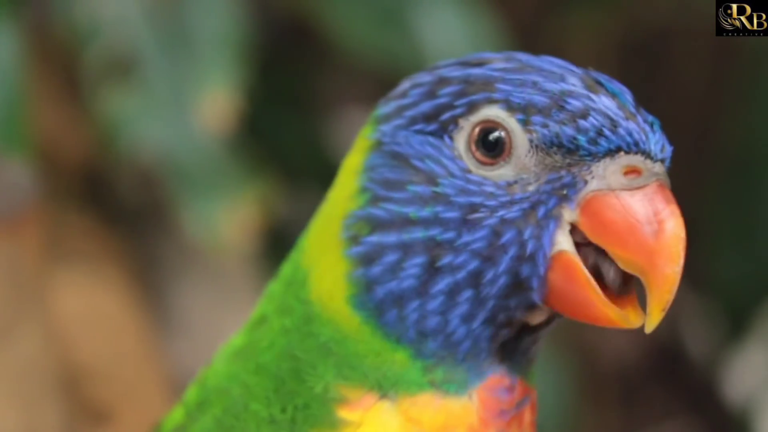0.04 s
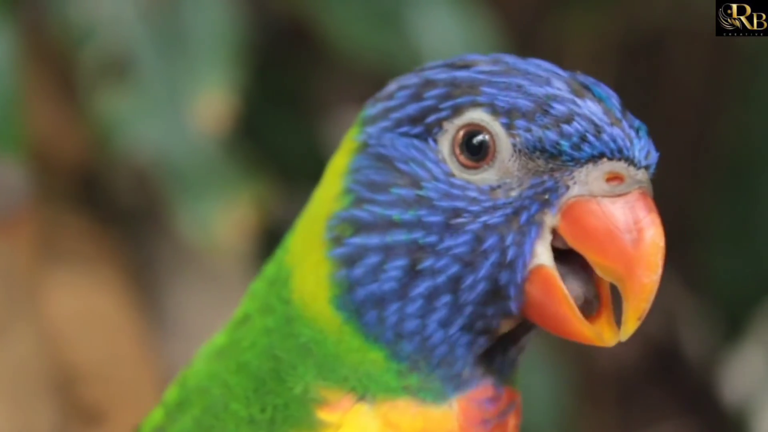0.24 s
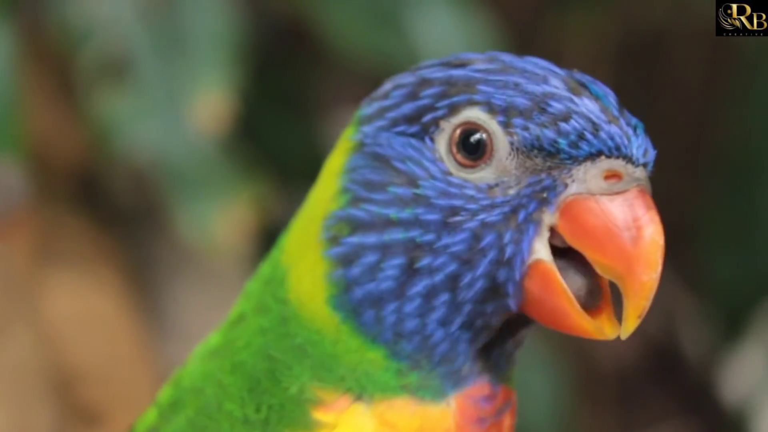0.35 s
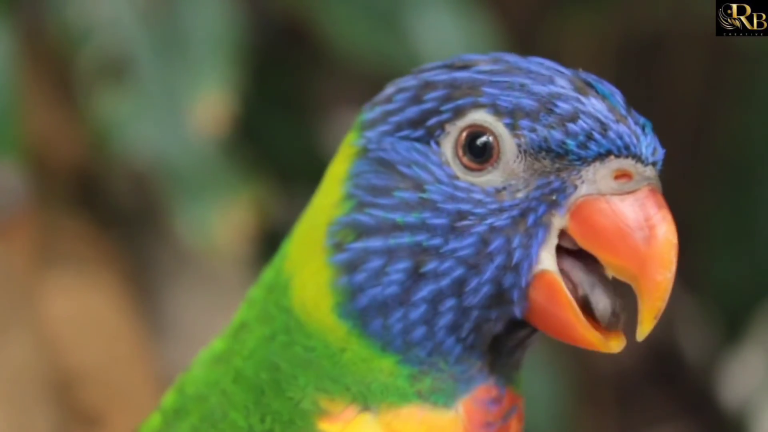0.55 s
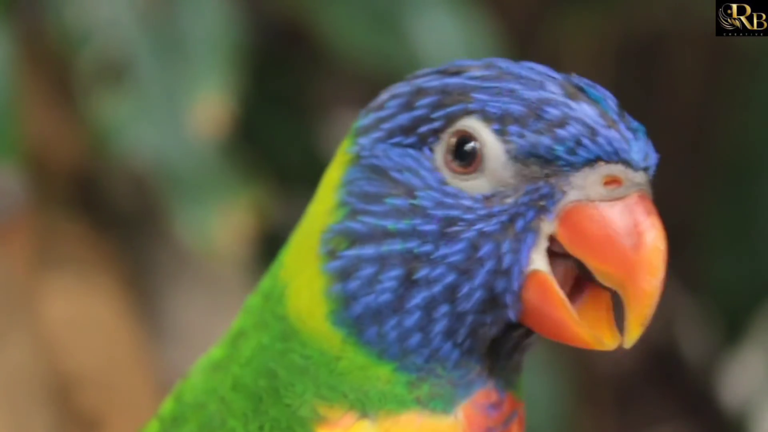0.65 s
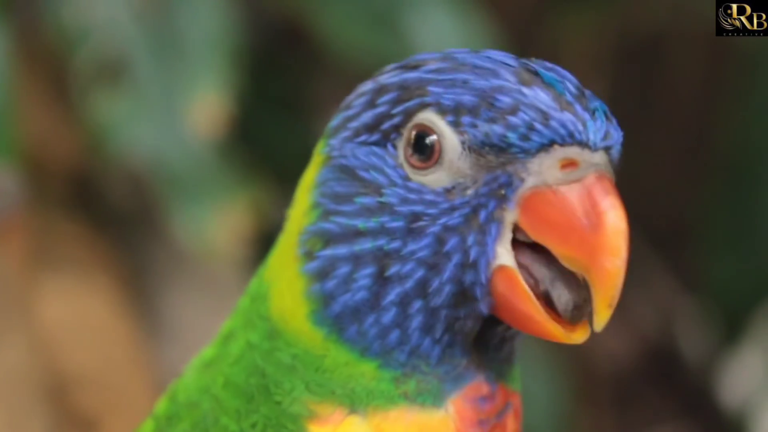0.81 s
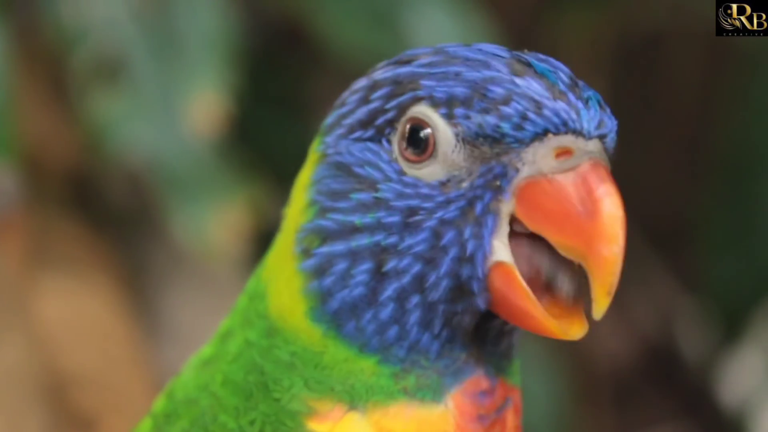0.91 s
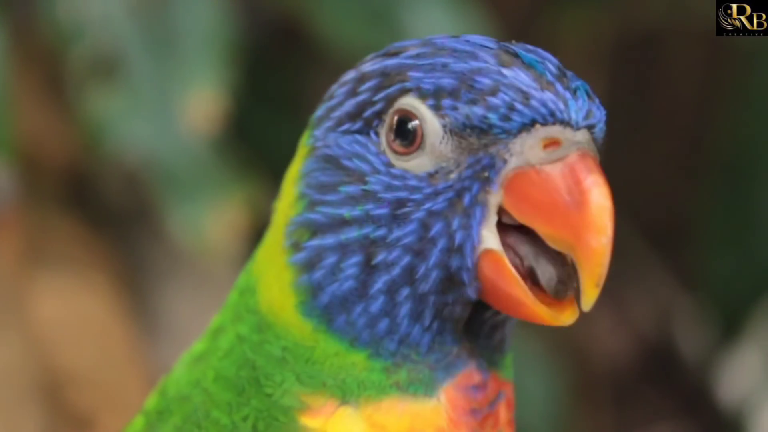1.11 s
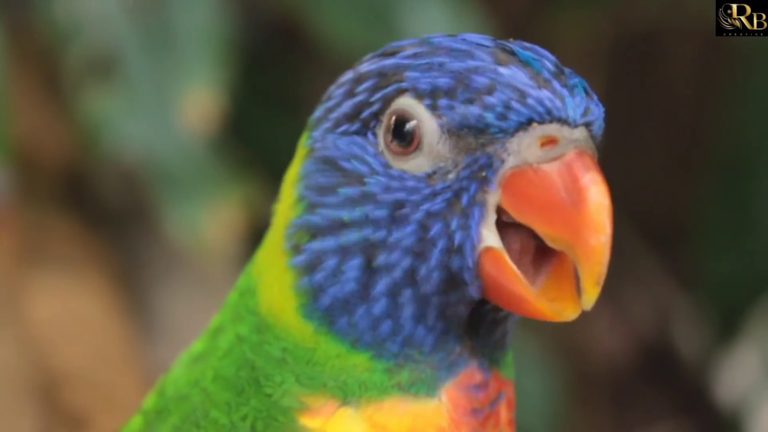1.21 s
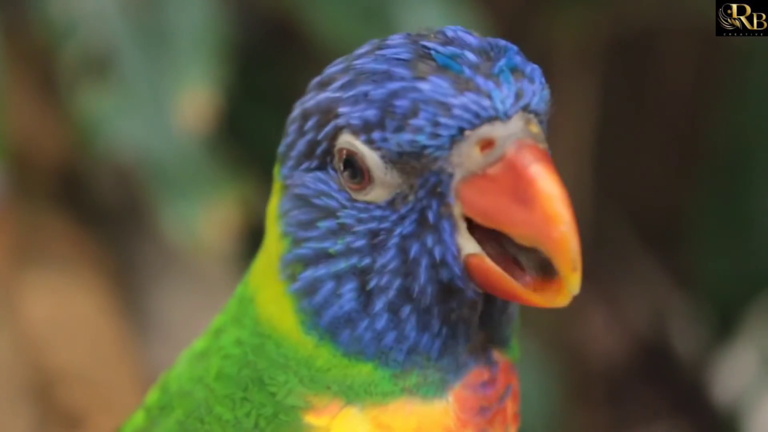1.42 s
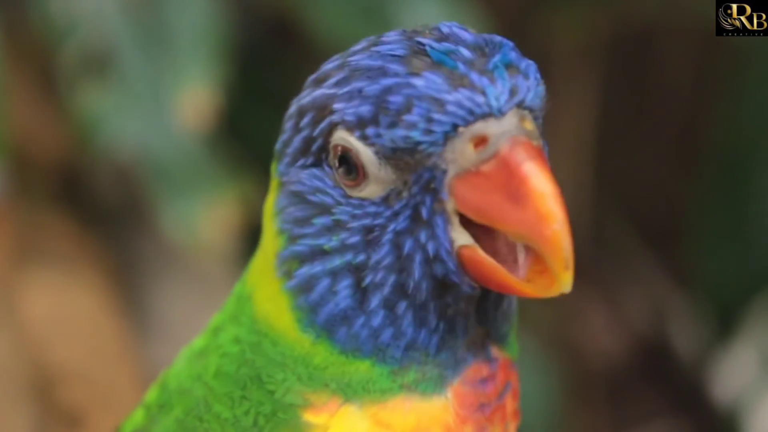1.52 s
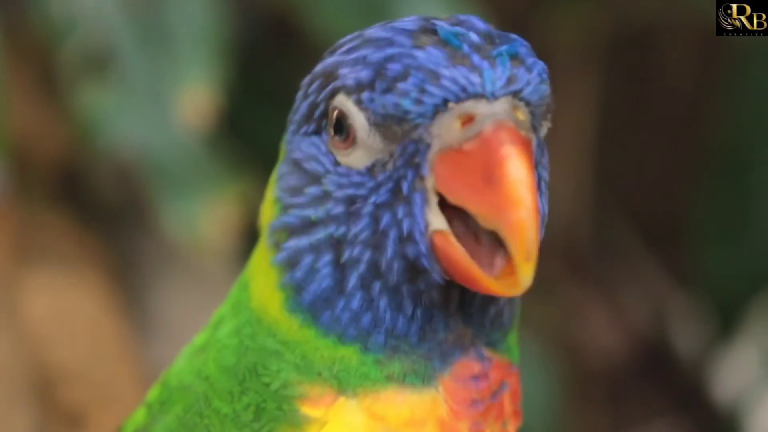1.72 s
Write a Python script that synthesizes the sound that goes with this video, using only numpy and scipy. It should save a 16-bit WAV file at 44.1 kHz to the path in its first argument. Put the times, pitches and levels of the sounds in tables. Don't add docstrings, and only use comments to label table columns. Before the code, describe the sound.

Small parrot gives three short bursts of shrill, whistled chirps over faint outdoor hiss

```python
import sys
import numpy as np
from scipy import signal
from scipy.io import wavfile
from scipy.ndimage import uniform_filter1d

SR = 44100
rng = np.random.default_rng(int(sys.argv[2]) if len(sys.argv) > 2 else 0)


def put_to_file(sound):
    columns = np.atleast_2d(sound).T
    safe = np.clip(columns, -1, 1)
    whole_steps = np.round(safe * 32767)
    wavfile.write(sys.argv[1], SR, whole_steps.astype(np.int16))


def amplitude_ratio(level_db):
    exponent = np.asarray(level_db, float) / 20
    return 10 ** exponent


N = 77175


def evened(x):
    return x / np.sqrt(np.mean(x ** 2) + 1e-20)


def level(points):
    s, db = np.transpose(points)
    return amplitude_ratio(np.interp(np.arange(N) / SR, s, db))


def wobble(count, span_s):
    size = max(int(span_s * SR), 2)
    noise = rng.standard_normal(count)
    return evened(uniform_filter1d(uniform_filter1d(noise, size), size))


# t/s, level/dB
HUM_LEVEL = [(0, -106), (.29, -104), (.32, -82.5), (.7, -85), (1.15, -92), (1.2, -100), (1.25, -91),
             (1.34, -94.5), (1.37, -112), (1.42, -94), (1.75, -99)]


def hum():
    hz = 45 + 1.5 * wobble(N, 0.043)
    return np.sqrt(2) * np.sin(2 * np.pi * np.cumsum(hz) / SR) * level(HUM_LEVEL)


# t/s, level/dB
RUMBLE_LEVEL = [(0, -84), (.38, -81), (.43, -100), (.68, -92), (.72, -85), (1.4, -84), (1.45, -76),
                (1.49, -85), (1.62, -84), (1.65, -73), (1.69, -84), (1.75, -86)]


def rumble():
    lump_s, lump_db = .03, 1.5
    band = signal.butter(4, (235, 400), "band", fs=SR, output="sos")
    low = signal.sosfilt(band, rng.standard_normal(N))
    return evened(low * amplitude_ratio(lump_db * wobble(N, lump_s))) * level(RUMBLE_LEVEL)


# f/Hz, level/dB per Hz
HISS_SPECTRUM = [(40, -33), (160, -30), (290, -9), (530, -8.5), (1200, -4.5), (3220, -12), (5280, -21.5),
                 (15000, -42)]
# t/s, level/dB
HISS_LEVEL = [(0, -63), (.136, -66.5), (.22, -61), (.3, -70.5), (.42, -77.5), (.445, -89), (.68, -81.5),
              (.75, -73.5), (1.03, -69.5), (1.11, -60.5), (1.3, -62.5), (1.75, -65.5)]


def hiss(patchy_db=2.2, gust_db=1.5, fizz_db=5):
    frames, hz = N // 256 + 5, np.fft.rfftfreq(1024, 1 / SR)
    real, imaginary, patches = rng.standard_normal((frames, 513, 3)).T
    patches = evened(uniform_filter1d(uniform_filter1d(patches, 12, 0), 10, 1))
    gusts = evened(uniform_filter1d(rng.standard_normal(frames), 12))
    flicker = evened(uniform_filter1d(rng.standard_normal(frames), 6)) - 1
    fizz = np.interp(hz, (6500, 9500), [0, fizz_db])[:, None] * flicker
    f, db = np.transpose(HISS_SPECTRUM)
    shape = amplitude_ratio(np.interp(np.log(hz + 1), np.log(f + 1), db))[:, None]
    band = (hz > 250) & (hz < 1900)
    whole_over_band = np.sqrt(np.sum(shape ** 2) / np.sum(shape[band] ** 2))
    swing = amplitude_ratio(patchy_db * patches + gust_db * gusts + fizz)
    spectra = (real + 1j * imaginary) * shape * swing
    wash = signal.istft(spectra, nperseg=1024, noverlap=768)[1][:N]
    return evened(wash) * whole_over_band * level(HISS_LEVEL)


def space(x, tail_db, t60, treble_t60):
    first_echo_s, treble_hz, tail_top_hz = 0.0088, 5500, 11000
    taps = np.zeros(SR)
    at = np.arange(0, SR - 20, 20)
    taps[at + rng.integers(0, 20, len(at))] = rng.choice([-1., 1.], len(at))
    t = np.arange(SR) / SR
    low = signal.sosfiltfilt(signal.butter(2, treble_hz, fs=SR, output="sos"), taps)
    decaying = low * amplitude_ratio(-60 * t / t60) + (taps - low) * amplitude_ratio(-60 * t / treble_t60)
    taps = (t > first_echo_s) * decaying
    taps = signal.sosfilt(signal.butter(4, tail_top_hz, fs=SR, output="sos"), taps)
    return x + amplitude_ratio(tail_db) * signal.fftconvolve(x, taps / np.linalg.norm(taps))[:N]


def bird(syllables, top_db, waver=.004, flutter_db=.3, breath_db=-60, top_hz=15650, ripple_db=0, strain=0):
    edge_s, round_s, shimmer_db, ripple_hz = .002, .004, 5, 135
    t = np.arange(N) / SR
    drift, out = wobble(N, 0.00087), np.zeros(N)
    shimmer = [wobble(N, .0025) for _ in range(4)]
    band = signal.butter(5, [2500, 9500], "band", fs=SR, output="sos")
    air = evened(signal.sosfilt(band, rng.standard_normal(N)))
    for rows in syllables:
        s, hz, db, octave_db = np.transpose(rows)
        on = (t > s[0] - edge_s) & (t < s[-1] + edge_s)
        u = t[on]

        def rounded(d):
            return amplitude_ratio(uniform_filter1d(np.interp(u, s, d), round(round_s * SR), mode="nearest"))

        main, second = rounded(db), rounded(octave_db)
        pitch = np.interp(u, s, hz) * (1 + waver * drift[on])
        phase = 2 * np.pi * np.cumsum(pitch) / SR
        upper = np.zeros(len(u))
        for k, d, w in zip((3, 4, 5), top_db, shimmer):
            overtone = amplitude_ratio(d + shimmer_db * w[on]) * np.sin(k * phase) * (k * pitch < top_hz)
            upper += overtone * (second / second.max()) ** (strain * (k - 3))
        tone = main * np.sin(phase)
        tone += second * amplitude_ratio(shimmer_db / 2 * shimmer[0][on]) * np.sin(2 * phase)
        tone += np.sqrt(main * second) * upper
        tone += amplitude_ratio(breath_db) * (main + second) * air[on]
        edge = np.clip(np.minimum(u - u[0], u[-1] - u) / (2 * edge_s), 0, 1)
        fade = np.sin(np.pi / 2 * edge) ** 2
        ripple = ripple_db * np.cos(2 * np.pi * ripple_hz * (u - s[1]))
        out[on] += np.sqrt(2) * tone * fade * amplitude_ratio(flutter_db * shimmer[3][on] + ripple)
    return out


# t/s, f/Hz, level/dB, octave level/dB
FAR_LOW = [
    [(0.624, 3400, -77, -77), (0.64, 3442, -53, -49.5), (0.65, 3440, -54.5, -54), (0.668, 3625, -62, -102)],
    [(.676, 3160, -57, -71), (.682, 3680, -48, -84), (.686, 3490, -62, -69), (.691, 3570, -48, -77),
     (.699, 3720, -50, -91)],
    [(.702, 3397, -48, -78), (.708, 3486, -46.5, -60), (.716, 3430, -49, -54), (.722, 3530, -50, -71),
     (.728, 3580, -43.5, -60), (.733, 3574, -57, -69), (.74, 3633, -42, -90), (.748, 3516, -47, -90),
     (.757, 3330, -61, -74)],
    [(.76, 3620, -53, -81), (.766, 3626, -44.5, -65), (.772, 3627, -38, -59.5), (.779, 3527, -33.5, -60.5),
     (.785, 3550, -54, -64.5)],
    [(.785, 3496, -52, -47), (.79, 3254, -49.5, -55.5), (.796, 3172, -42, -50), (.802, 3490, -45.5, -57.5),
     (.808, 3520, -67, -71)],
]


def far_bird_low():
    low = bird(FAR_LOW[1:], [-16, -70, -70], waver=0.0038, flutter_db=2.5, breath_db=-44, top_hz=11500)
    return low + bird(FAR_LOW[:1], [-17, -27, -70])


# t/s, f/Hz, level/dB, octave level/dB
FAR_HIGH = [
    [(.666, 4590, -64, -87), (.673, 4510, -51, -71), (.679, 4330, -63, -100)],
    [(.686, 4560, -72, -72), (.695, 4594, -38.5, -51), (.702, 4600, -63, -58)],
    [(.732, 4690, -52.5, -86), (.738, 4670, -34.5, -75), (.744, 4682, -31.5, -52.5),
     (.748, 4570, -33.5, -50), (.751, 4620, -46, -45.5), (.758, 4490, -42, -51.5), (.764, 4520, -65, -65.5)],
]


def far_bird_high():
    return bird(FAR_HIGH, [-16, -70, -70], top_hz=11500)


# centre t/s, length/s, level/dB
TAIL_SWELLS = [
    (1.406, 0.023, -55.5),
    (1.425, 0.033, -51.5),
    (1.472, 0.033, -57.5),
    (1.52, .04, -61),
    (1.555, .04, -67.5),
]


def tail_swells():
    t = np.arange(N) / SR
    swell = np.zeros(N)
    for s, length, db in TAIL_SWELLS:
        swell += amplitude_ratio(db) * np.cos(np.pi * np.clip((t - s) / length, -.5, .5)) ** 2
    hz = 3090 * (1 + 0.0057 * wobble(N, 0.0049))
    return np.sqrt(2) * swell * np.sin(2 * np.pi * np.cumsum(hz) / SR)


# t/s, f/Hz, level/dB, octave level/dB
MID_FALL = [
    [(1.098, 2620, -58, -61.5), (1.104, 2582, -46, -44), (1.109, 2480, -48, -50.5), (1.113, 2414, -54, -39),
     (1.118, 2382, -33.5, -32.5), (1.122, 2283, -40.5, -45), (1.125, 2200, -41.5, -55),
     (1.13, 2060, -44, -52.5)],
    [(1.134, 2854, -63.5, -57.5), (1.146, 2808, -53.5, -52), (1.152, 2712, -47, -56),
     (1.157, 2700, -39.5, -41.5), (1.163, 2446, -42.5, -55), (1.17, 2443, -35.5, -36.5),
     (1.177, 2510, -48.5, -39.5), (1.181, 2830, -43, -52)],
]
# t/s, f/Hz, level/dB, octave level/dB
MID_SLIP = [
    [(1.129, 1398, -54.5, -63), (1.139, 1230, -54.5, -57)],
    [(1.236, 4080, -59.5, -85), (1.247, 3574, -50, -90)],
]


def middle_bird_fall():
    return bird(MID_FALL + MID_SLIP, [-31, -25, -70], waver=.012, flutter_db=1.5, breath_db=-39)


# t/s, f/Hz, level/dB, octave level/dB
MID_RISE = [
    [(1.181, 2920, -58, -59), (1.185, 3040, -41.5, -67.5), (1.196, 2883, -48.5, -53),
     (1.209, 2866, -36, -46), (1.214, 2883, -42, -49), (1.219, 2968, -26.5, -50), (1.228, 3065, -27.5, -64),
     (1.234, 3140, -38.5, -70), (1.242, 3100, -42.5, -80)],
    [(1.242, 3044, -42.5, -63.5), (1.249, 3046, -27, -54.5), (1.269, 3099, -27.5, -39.5),
     (1.289, 3086, -38.5, -57), (1.307, 3115, -36.5, -56.5), (1.326, 3090, -46.5, -63),
     (1.334, 3090, -37, -67), (1.345, 3090, -51, -60.5), (1.358, 2990, -64, -81.5)],
]


def middle_bird_rise():
    return bird(MID_RISE, [-28, -70, -37], flutter_db=0.6, strain=.25)


# t/s, f/Hz, level/dB, octave level/dB
NEAR_LEAD = [
    [(.186, 2990, -56, -89.5), (.196, 2975, -45.5, -69.5), (.211, 2980, -45, -72), (.218, 3100, -37, -64),
     (.221, 3100, -36.5, -63.5), (.225, 3430, -37, -110)],
]
# t/s, f/Hz, level/dB, octave level/dB
NEAR_LOUD = [
    [(.221, 2740, -36, -60), (.225, 2780, -19.5, -48), (.233, 2850, -18.5, -47), (.248, 2950, -19.5, -43),
     (.252, 3120, -31, -46), (.258, 3100, -54, -72)],
]
# t/s, f/Hz, level/dB, octave level/dB
NEAR_LOW = [
    [(.285, 2880, -40, -58), (.289, 2920, -32, -52), (.298, 2930, -33, -53), (.305, 2990, -28.5, -52),
     (.318, 2830, -29, -46), (.323, 3050, -28, -52), (.332, 2960, -37, -62), (.339, 2930, -34, -58),
     (.344, 2700, -42, -52)],
    [(.345, 2800, -38, -54), (.35, 2960, -28, -48), (.355, 2970, -28, -46), (.36, 3010, -22.5, -42),
     (.365, 3150, -22, -43), (.372, 3380, -36, -58)],
]
# t/s, f/Hz, level/dB, octave level/dB
NEAR_MID = [
    [(0.394, 3307, -24, -75), (0.4, 3346, -27.5, -47), (0.408, 3302, -27, -49.5),
     (0.418, 3420, -22.5, -56.5), (0.423, 3510, -68, -59)],
    [(0.441, 3500, -29, -51.5), (0.453, 3342, -32, -48), (0.465, 3274, -38, -56),
     (0.475, 3590, -30.5, -51.5), (0.483, 3600, -47, -81.5)],
]
# t/s, f/Hz, level/dB, octave level/dB
NEAR_HIGH = [
    [(.25, 3865, -36.5, -84), (.255, 4320, -53.5, -103), (.261, 4115, -62, -100)],
    [(.369, 4160, -32, -76.5), (.373, 4375, -32, -82.5), (.382, 4434, -35.5, -75.5),
     (.385, 3970, -34.5, -56), (.388, 4350, -29.5, -57), (.392, 4330, -37.5, -65), (.396, 3740, -31, -55.5)],
    [(.421, 4370, -32.5, -70.5), (.425, 4440, -34, -65), (.437, 4374, -36, -56), (.44, 4200, -30, -67.5),
     (.443, 3550, -49, -76)],
    [(.48, 4404, -41.5, -80.5), (.487, 4460, -38, -65.5), (.498, 4460, -63, -93.5)],
]
# t/s, f/Hz, level/dB, octave level/dB
NEAR_CROAK = [
    [(.274, 1265, -52.5, -43), (.28, 1390, -42.5, -49), (.288, 1430, -56, -62.5)],
]


def near_bird():
    whistle = bird(NEAR_LOUD + NEAR_LOW + NEAR_HIGH, [-45, -41, -44], ripple_db=.55)
    whistle = whistle + bird(NEAR_MID, [-47, -31, -50])
    lead = bird(NEAR_LEAD, [-26, -17, -14])
    croak = bird(NEAR_CROAK, [-3, -3, -10])
    return whistle + lead + croak


def scene():
    near, far_low = near_bird(), far_bird_low()
    far_high = space(far_bird_high(), tail_db=-18, t60=.73, treble_t60=.28)
    rise, fall = middle_bird_rise(), middle_bird_fall()
    birds = space(near, tail_db=-37.5, t60=.45, treble_t60=.13)
    birds = birds + space(far_low, tail_db=-15, t60=.73, treble_t60=.28) + far_high
    birds = birds + space(rise, tail_db=-23, t60=.35, treble_t60=.45) + tail_swells()
    birds = birds + space(fall, tail_db=-18, t60=.38, treble_t60=.4)
    return (birds + hiss() + hum() + rumble())[None]


def band_limit(x):
    return signal.sosfilt(signal.butter(12, 15660, fs=SR, output="sos"), x)


def record(dry):
    return band_limit(dry)


dry = scene()
out = record(dry)
put_to_file(out)
```